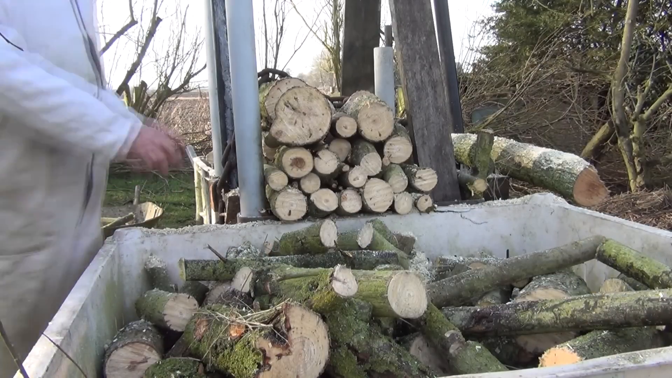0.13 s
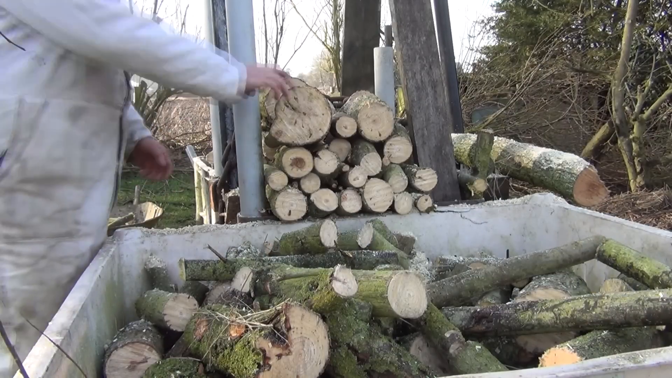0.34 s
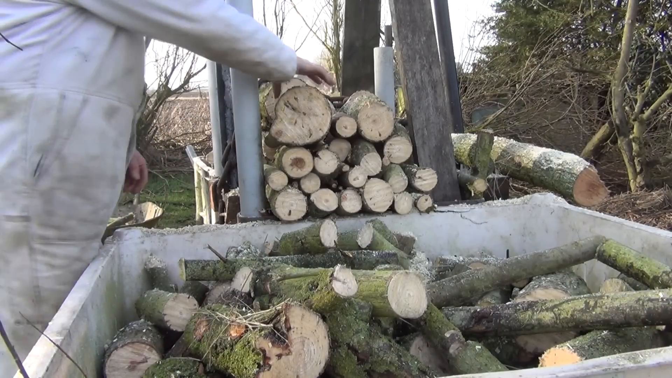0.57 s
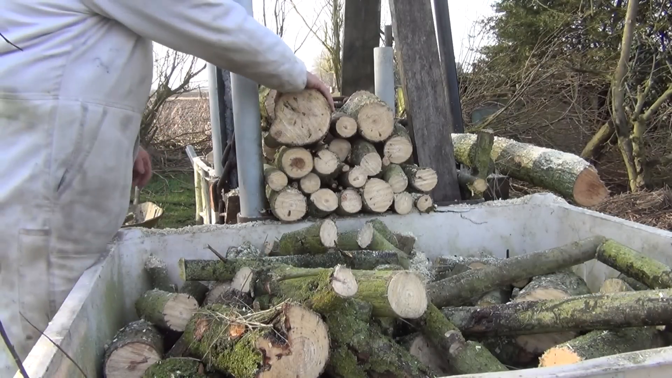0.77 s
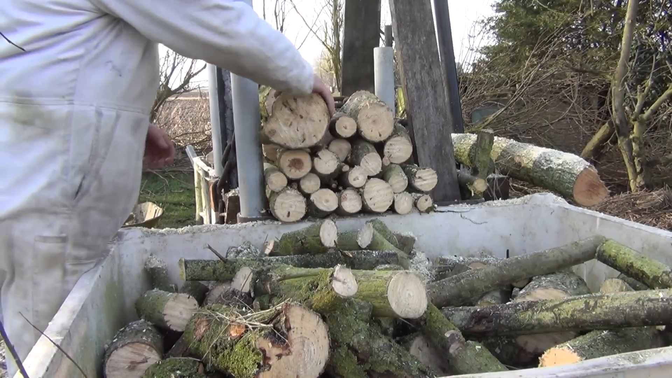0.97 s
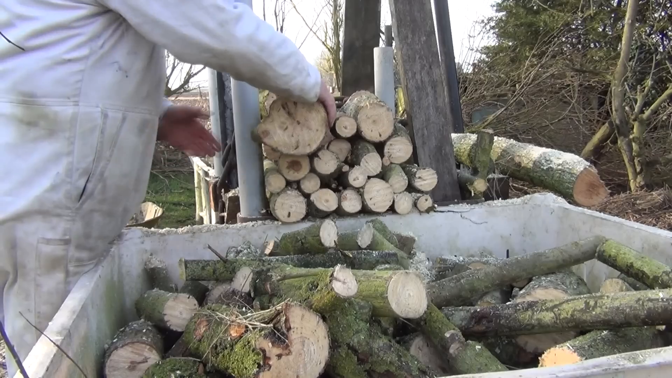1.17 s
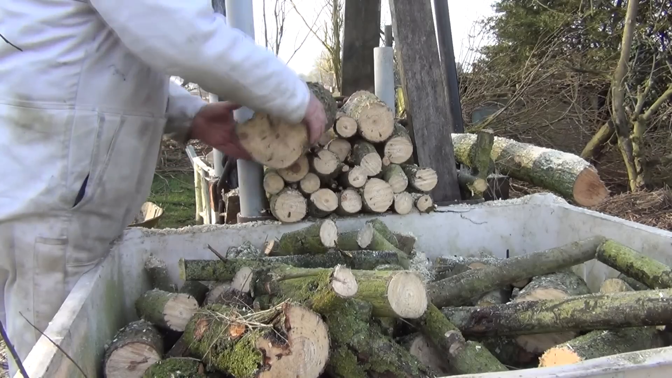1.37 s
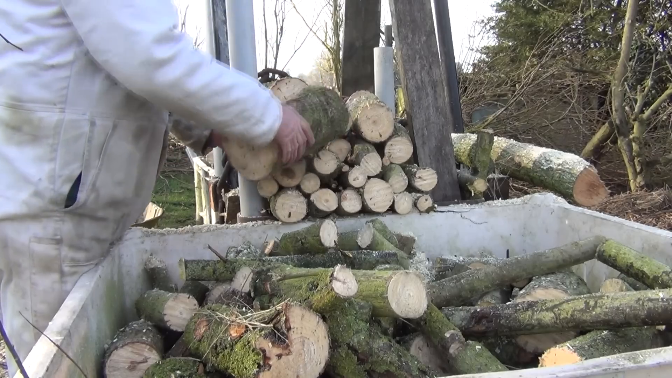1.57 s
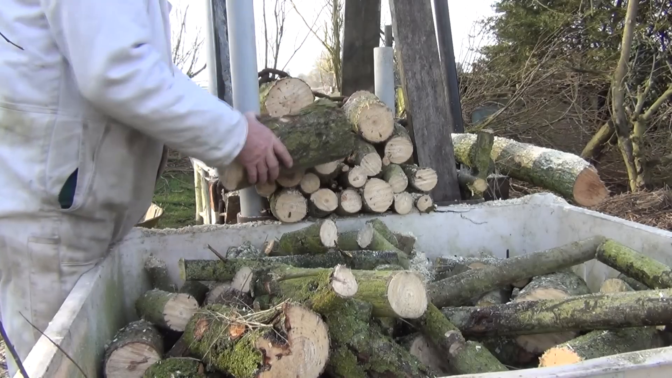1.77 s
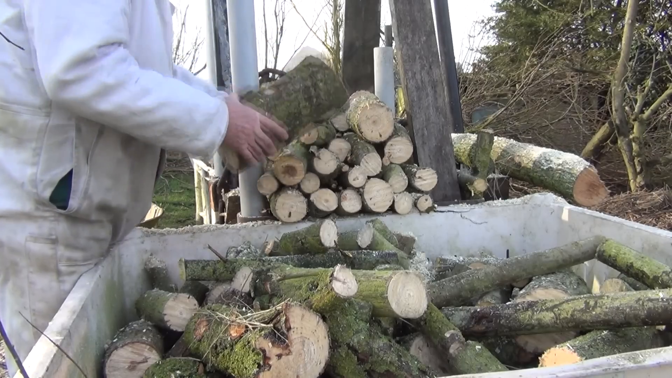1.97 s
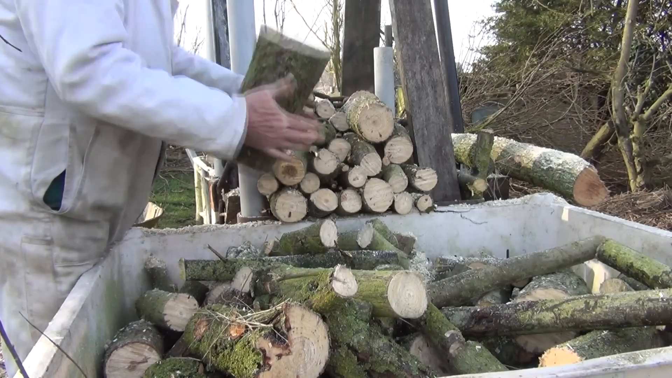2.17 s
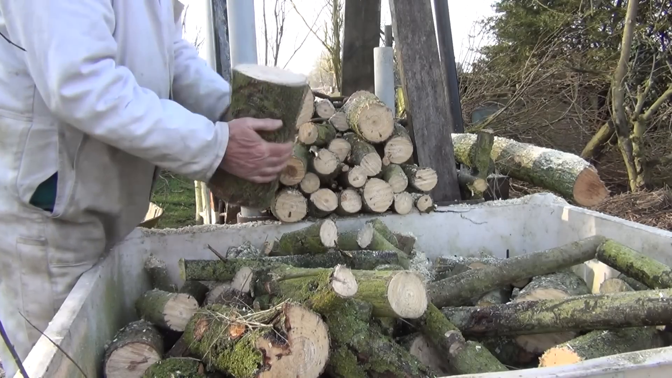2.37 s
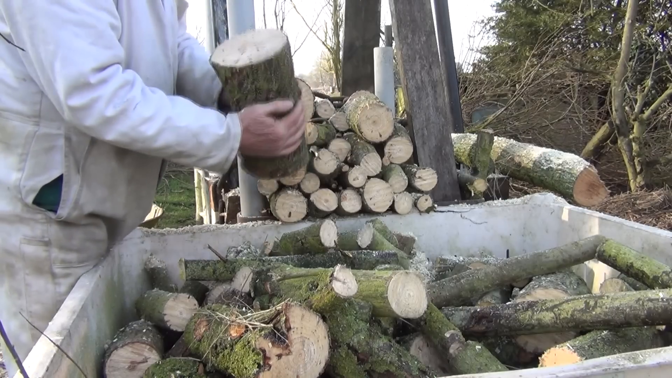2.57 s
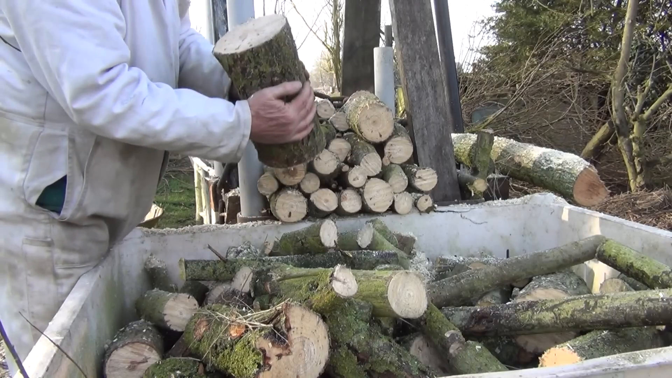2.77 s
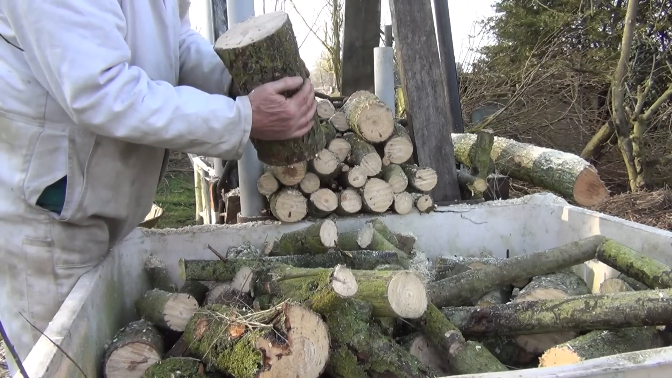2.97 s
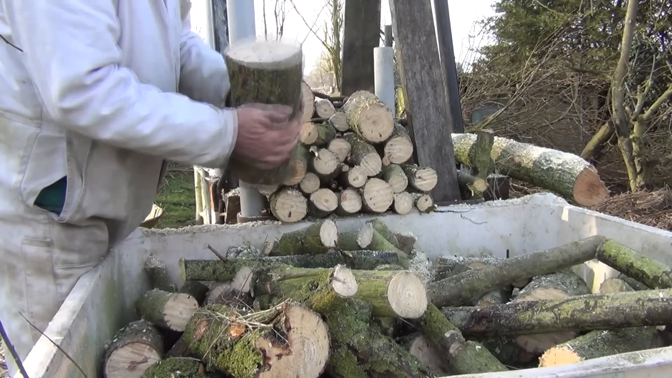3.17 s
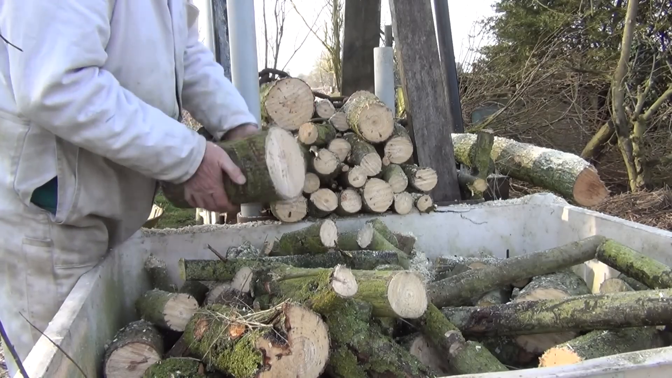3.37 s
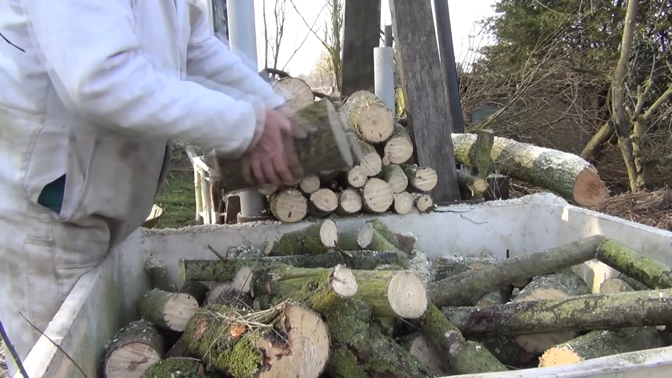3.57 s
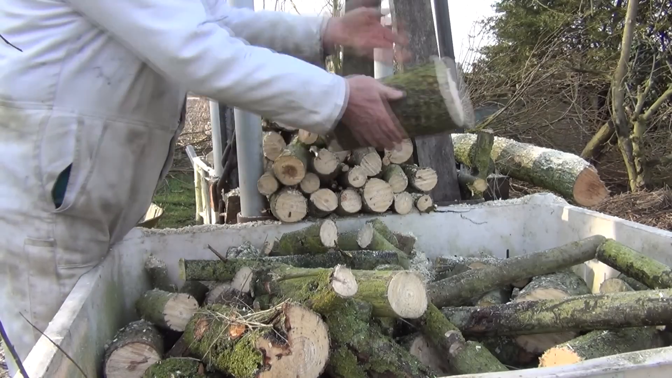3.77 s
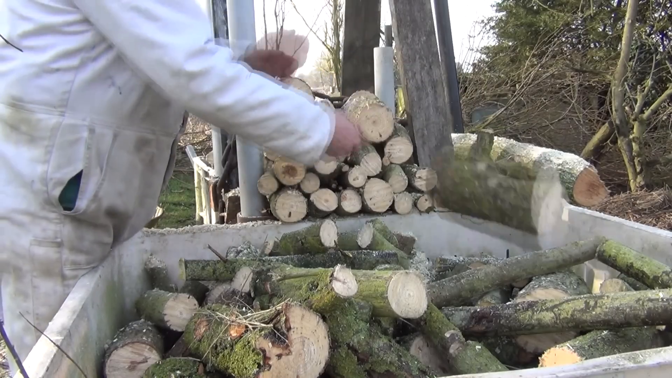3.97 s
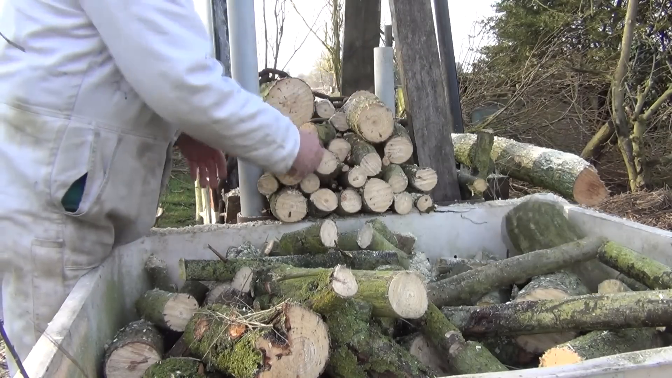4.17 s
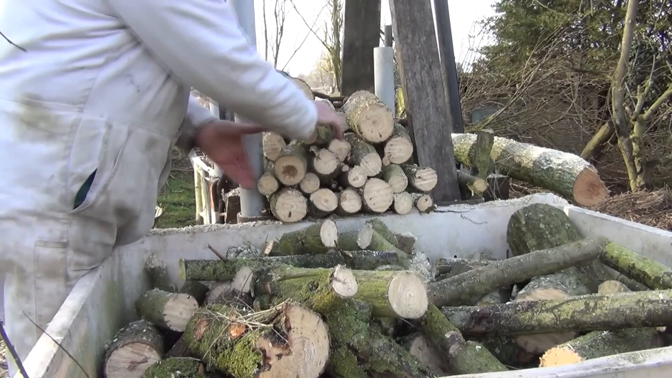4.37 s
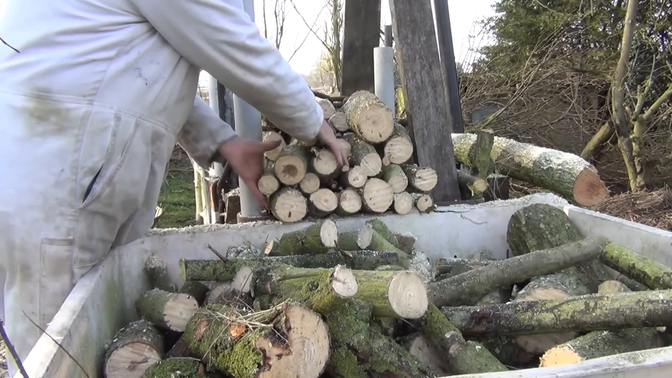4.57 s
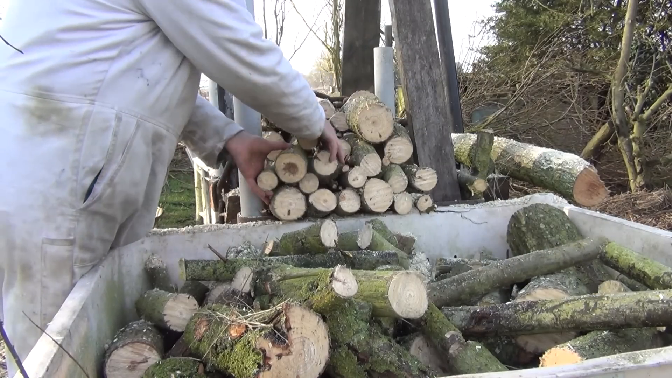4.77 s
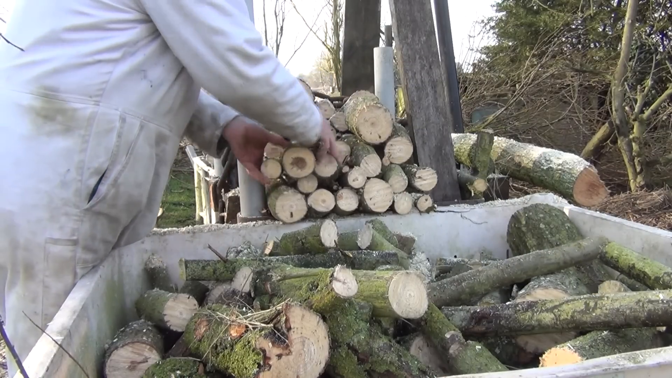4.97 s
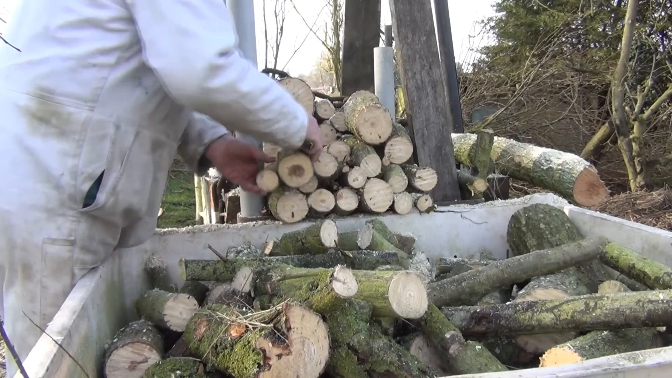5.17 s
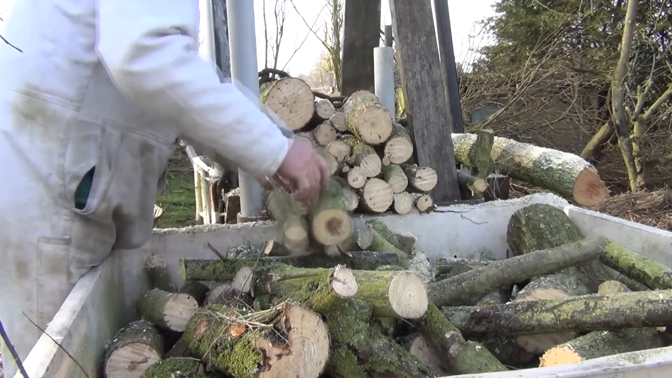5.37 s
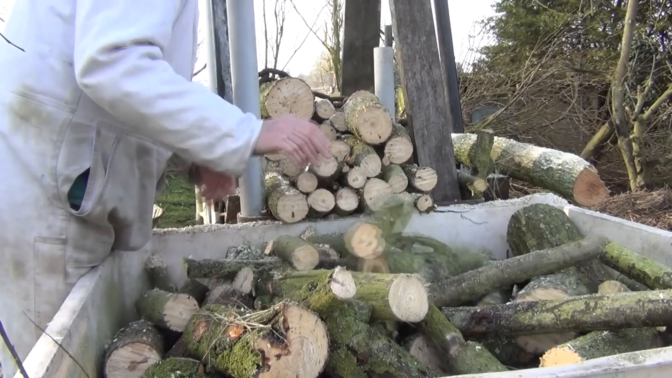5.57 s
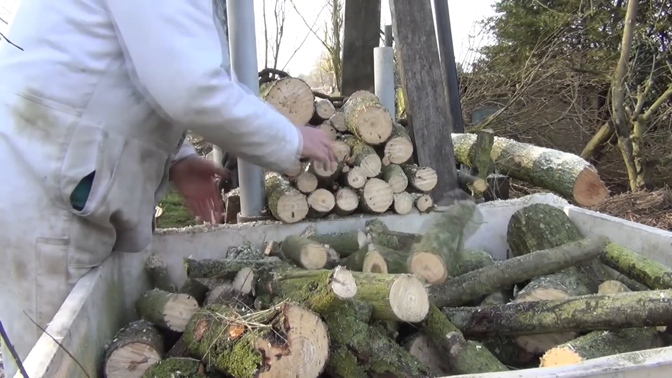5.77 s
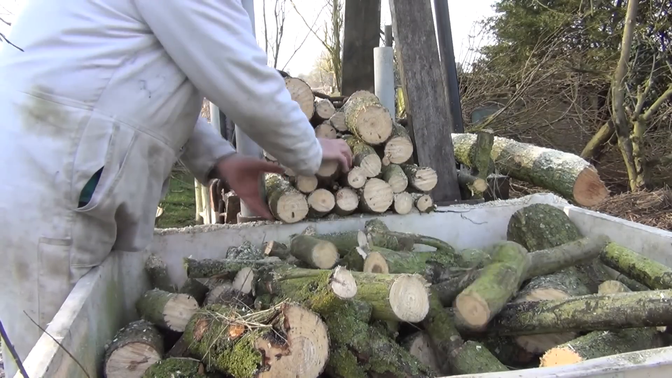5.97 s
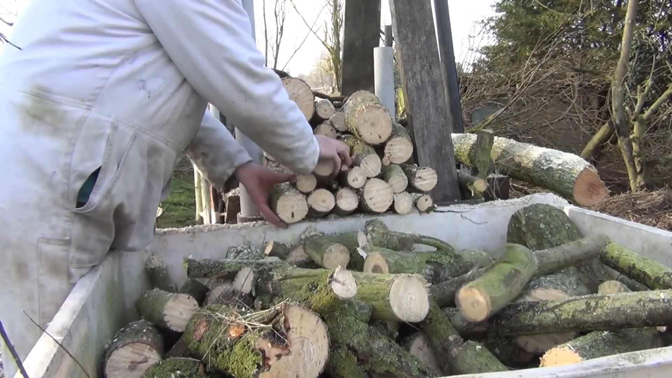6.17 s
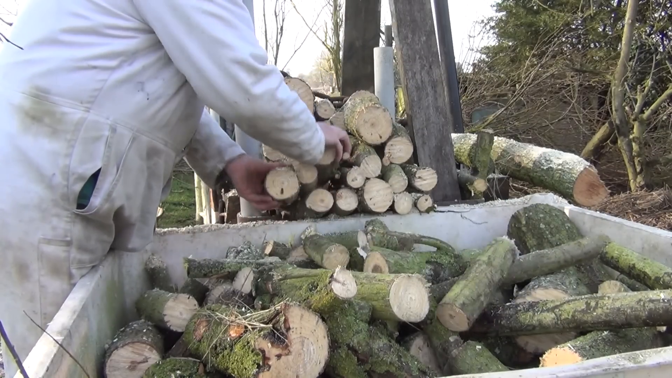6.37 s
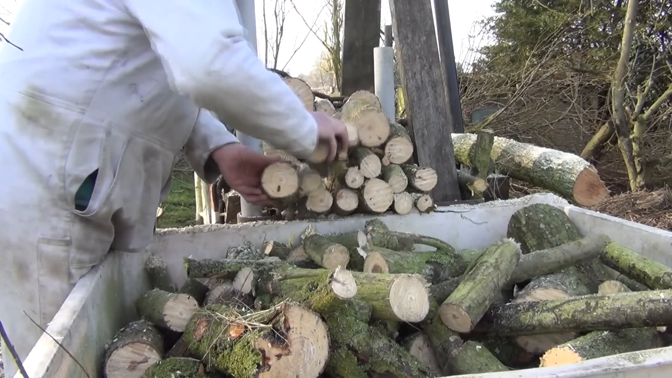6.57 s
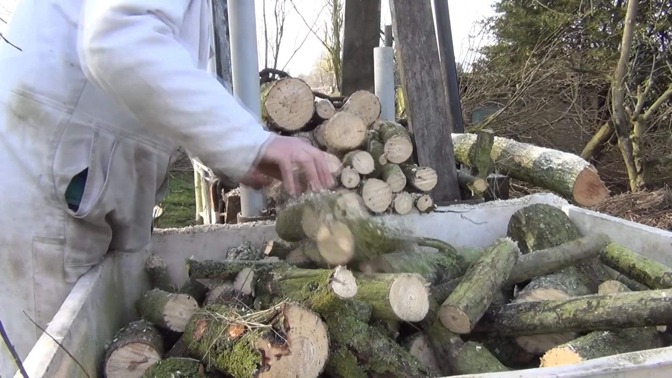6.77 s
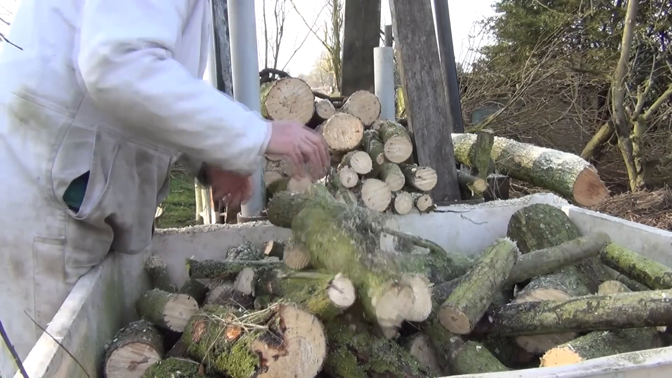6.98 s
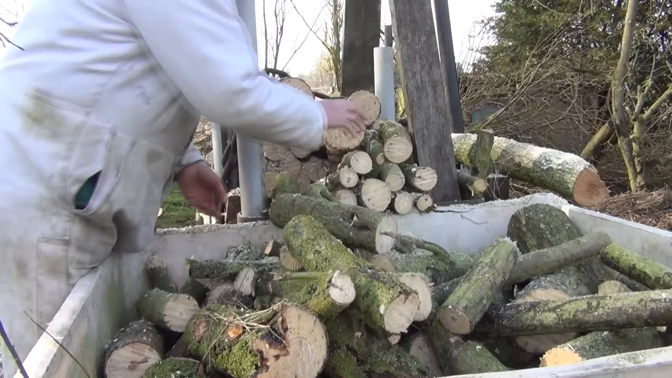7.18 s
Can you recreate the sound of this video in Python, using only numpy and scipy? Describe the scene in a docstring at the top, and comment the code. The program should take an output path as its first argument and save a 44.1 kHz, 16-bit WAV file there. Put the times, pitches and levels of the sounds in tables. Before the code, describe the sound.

Outdoors, a quiet rustle and scrape, then a thrown log lands with a loud tumbling clatter, followed by smaller logs knocking and rolling down.

```python
"""A small bird whistles at once as far traffic and a machine's hum swell up: an open yard, out of doors.
Next a soft, breathy rush swells to the left; then, close to the microphone, short green logs are pulled off
a stack and tossed onto a heap in a steel trailer. Decaying notes and noise bursts make the thuds and knocks;
shaped grit makes rolling, bark scrapes and sleeve rustle; gliding sines whistle; trailer and hedge echo."""
import sys
import numpy as np
from scipy import signal
from scipy.fft import rfft, irfft, next_fast_len
from scipy.io import wavfile
from scipy.ndimage import uniform_filter1d, map_coordinates

SR = 44100
rng = np.random.default_rng(int(sys.argv[2]) if len(sys.argv) > 2 else 0)


def digitize_waveform(pressure):
    """Quantize a signal to 16-bit integers and store it at the path in sys.argv[1].

    Rows of a 2-D input are taken as channels; values are limited to [-1, 1].
    """
    field = np.atleast_2d(pressure).T
    bounded = np.clip(field, -1, 1)
    quanta = np.round(bounded * 32767).astype(np.int16)
    wavfile.write(sys.argv[1], SR, quanta)


N = 318843  # samples

# Far traffic, wind and hiss, spectrum shape: freq_hz, level_db (per Hz)
AIR_SPECTRUM = [(12, -38), (20, -2.5), (131, -1), (195, -8.5), (258, -12), (382, -16), (652, -15),
                (966, -13), (1080, -12.5), (1350, -22.5), (2440, -23.5), (2660, -22.5), (5520, -29.5),
                (15200, -32.5), (16500, -53)]
AIR_DB = -57  # before the swell
# Likeness of left and right in the air: freq_hz, likeness (0-1)
AIR_LIKENESS = [(60, 0.92), (240, 0.87), (950, 0.87), (2000, 0.62), (2700, 1), (4800, 1), (6500, 0.82),
                (10000, 0.99), (15000, 0.99)]
# The background grows at first: time_s, air_gain_db, hum_gain_db
SWELL = [(0, 2, -22), (.5, 5, -3.5), (1.5, 2, 3), (5, 1, 5), (7.23, 3.5, 2)]
# Tones of the far machine, before the swell: freq_hz, level_db
HUM_TONES = [(127.5, -59), (255, -69.5)]
# Noisy bands of the far machine: freq_hz, width_hz, level_db
DRONE_BANDS = [(657, 17, -75), (1095, 49, -67.5), (1830, 360, -68)]
# Bird whistles: start_s, length_s, first_hz, last_hz, level_db (before a 1 dB lift)
WHISTLES = [(0.005, 0.025, 3800, 2800, -54.5), (0.604, .04, 4230, 4370, -63),
            (0.679, 0.11, 3980, 3940, -61), (0.897, 0.072, 3880, 3940, -64),
            (2.272, 0.044, 4600, 4350, -63), (2.31, 0.053, 4430, 4350, -65), (2.43, 0.089, 3170, 3050, -66),
            (2.568, 0.092, 4295, 4230, -55.5), (2.71, .04, 3050, 2950, -64),
            (2.752, 0.024, 3580, 3180, -62.5), (2.768, 0.049, 3250, 3030, -59.5),
            (2.905, 0.088, 4190, 4184, -50), (3.058, 0.024, 3450, 2900, -68),
            (3.098, 0.055, 3200, 3090, -61), (3.154, 0.023, 3700, 3000, -57),
            (3.222, 0.033, 4020, 4120, -65), (3.246, 0.11, 4150, 4140, -55.5),
            (3.935, 0.068, 4190, 4180, -53.5), (4.02, 0.053, 4170, 4190, -60),
            (4.325, 0.04, 4150, 4170, -57), (5.704, 0.062, 3870, 3950, -58)]
# Soft, breathy rush: time_s, level_db
RUSH_LEVEL = [(.17, -71), (.21, -57.5), (.45, -58), (.62, -53.5), (.72, -60), (.85, -73)]
# Its bands: freq_hz, width_hz, relative_db
RUSH_BANDS = [(875, 120, -3.5), (1220, 35, 2), (1430, 100, 1.5), (1850, 220, -2.5), (2550, 310, -11.5)]

# Handling: time_s, rolling_db, scrape_db, rustle_db (sleeves and moss)
HANDLING = [(0.7, -99, -81, -87), (0.96, -58, -59.5, -67), (1.16, -54, -58.5, -58.5),
            (1.4, -56.5, -59.5, -65), (1.68, -66.5, -67, -63.5), (2.44, -60, -66, -67.5),
            (3.335, -87, -103, -91), (3.355, -67, -70, -56.5), (3.42, -71, -61, -43.5),
            (3.544, -53, -57, -41.5), (3.6, -54.5, -61, -48), (3.9, -62.5, -67, -54.5),
            (4.07, -61.5, -59, -74), (4.158, -30, -57, -61), (4.33, -43, -44.5, -78),
            (4.408, -38.5, -44.5, -75), (4.62, -56, -66, -60), (4.9, -60, -62.5, -62.5),
            (5.02, -52, -58, -55), (5.26, -49, -53, -51.5), (5.55, -43, -50.5, -56.5),
            (5.63, -52, -58, -75), (5.7, -26, -39, -55), (5.735, -56, -61, -63), (5.8, -49, -64, -65),
            (5.93, -52, -56, -60.5), (6.3, -57, -57, -61.5), (6.37, -45, -50, -59),
            (6.46, -36, -41.5, -49.5), (6.51, -44, -55.5, -56), (6.6, -43, -51.5, -46.5),
            (6.766, -39.5, -53, -49), (6.916, -28, -43, -49), (6.99, -41.5, -47, -60),
            (7.05, -31, -50, -50), (7.14, -38.5, -51, -58.5), (7.23, -40.5, -61, -62)]
# The big log slides out of the hands as it is swung: time_s, scrape_db, shrill_share (0-1)
SLIDE = [(3.335, -65, 0.2), (3.37, -50, 0.3), (3.45, -49.5, 0.25), (3.544, -43.5, 0.53), (3.565, -43, 0.7),
         (3.585, -39.5, 0.69), (3.68, -33.5, 0.74), (3.74, -40.5, 0.9), (3.785, -46.5, 0.51),
         (3.82, -48.5, 0.2), (3.92, -99, 0.3)]
# Spectrum shape of rolling logs: freq_hz, level_db (per Hz)
ROLL_SPECTRUM = [(40, -4.5), (100, 10.5), (250, 11), (500, 0.5), (1000, -17), (2000, -34)]
# Scraped logs: freq_hz, width_hz, relative_db
BARK_BANDS = [(700, 470, 6.5), (1514, 126, 7.5), (1670, 130, 3), (1860, 160, 7), (2660, 660, -3.5)]
# Bark sliding fast over cloth: freq_hz, width_hz, relative_db
SHRILL_BANDS = [(3450, 930, 10), (4660, 2300, 2.5)]
# Spectrum shape of the rustle: freq_hz, level_db (per Hz)
RUSTLE_SPECTRUM = [(1180, -32), (2000, -9.5), (5570, -9), (6030, -8.5), (7720, -7.5), (9540, -5.5),
                   (15400, -16.5), (16100, -30), (16500, -45)]
# Brushes of sleeve and moss: start_s, peak_db
BRUSHES = [(0.71, -55), (1.792, -71), (2.077, -58), (2.528, -62), (3.516, -46), (3.805, -56), (3.911, -52),
           (4.567, -66), (4.642, -68), (4.78, -55), (4.962, -55), (6.098, -69), (6.615, -61), (7.097, -55)]
BRUSH_S = 0.052
SHRILL_RUB_DB = -17.5  # rubbing hands add a shrill scrape, this far under the rustle
SCRAPE_JERK_DB, SLIDE_JERK_DB, RUSTLE_JERK_DB = 2.4, 0.9, 1.1  # level change per unit of jerk
SCRAPE_PATCH_DB, RUSTLE_PATCH_DB = 1.8, 2.6  # rms unevenness over time and frequency

# Dry ticks of twigs and bark flakes: start_s, level_db (before the band filter), centre_hz
TICKS = [(1.1043, -28, 4970), (1.175, -37, 3600), (2.2936, -8, 3250), (3.587, -30, 3600),
         (3.663, -19, 3600), (3.682, -22, 3600), (4.2574, -6.5, 2320), (4.7601, -38.5, 3280),
         (4.881, -46, 3280), (5.0663, -43, 3300), (5.1327, -41, 3300), (5.299, -39, 3300),
         (6.2467, -41, 3300)]
# Bark grinds while a log skids on the heap: start_s, length_s, level_db (before colouring)
GRINDS = [(4.109, .024, -30), (4.132, 0.02, -33.5), (4.195, 0.017, -40.5), (4.219, 0.019, -40),
          (4.27, 0.013, -39), (4.383, 0.047, -52.5), (5.442, 0.068, -40.5), (5.552, 0.014, -44),
          (5.641, 0.069, -42.5), (6.863, .06, -45.5), (6.947, 0.041, -46.5), (7.009, 0.0454, -44)]
GRIND_EDGE_S = 0.0054
# The wood sounding through the grinding: freq_hz, width_hz, gain_db
GRIND_WOOD = [(1300, 1450, 5.5)]
# Hard contacts, log on log: start_s, level_db, pitch_hz, t60_s, crack_db (bark); levels before shaping
KNOCKS = [(0.735, -41.5, 920, 0.033, -52), (0.9243, -35, 1785, 0.049, -20), (0.932, -40, 1860, .05, -31.5),
          (1.103, -45, 1070, 0.044, -28), (1.173, -40.5, 1850, 0.07, -33),
          (1.3037, -41, 1850, 0.068, -30.5), (1.314, -42, 1820, .05, -29), (1.644, -41, 1930, 0.031, -34),
          (2.111, -62, 1050, .05, -35), (2.2919, -7.5, 1830, 0.013, -10.5), (2.2928, -12, 2530, 0.022, -40),
          (2.3165, -35, 1970, 0.035, -28), (3.5456, -36, 3760, 0.036, -20), (3.5885, -29, 3280, 0.042, -43),
          (4.114, -13.5, 1553, 0.066, -24.5), (4.136, -7, 966, 0.057, -21), (4.137, -8, 1830, 0.032, -38),
          (4.1991, -26, 700, 0.22, -36), (4.22, -15.5, 845, 0.12, -25), (4.235, -8, 956, 0.048, -42),
          (4.2547, -8.5, 824, 0.14, -16.5), (4.2719, 2, 1057, 0.025, -35), (4.287, -2, 1144, 0.019, -42.5),
          (4.367, -42, 1670, .05, -30), (4.405, -38, 3590, 0.069, -35), (4.607, -48, 1140, 0.045, -37.5),
          (4.803, -41.5, 1620, 0.053, -36), (4.958, -49, 2390, 0.044, -32.5),
          (5.2604, -42, 1830, 0.21, -35), (5.35, -37, 1420, 0.08, -51), (5.4007, -22, 2030, 0.013, -31.5),
          (5.411, -28, 3500, 0.019, -32), (5.442, -37, 2900, 0.058, -21.5), (5.465, -34, 1300, 0.077, -24),
          (5.471, -33, 2200, 0.053, -30), (5.4818, -35.5, 1880, 0.11, -18),
          (5.5203, -28.5, 1860, 0.072, -22), (5.538, -40, 2280, 0.038, -48), (5.56, -20, 1300, 0.052, -29),
          (5.5689, -17, 2005, 0.052, -10), (5.571, -19, 2700, 0.023, -33), (5.61, -19, 2244, 0.042, -13),
          (5.64, -37, 1030, 0.045, -46), (5.661, -32, 1985, 0.1, -27), (5.681, -26, 1850, 0.048, -24),
          (5.71, -26, 1870, 0.025, -32.5), (5.795, -33.5, 1390, 0.023, -49),
          (5.893, -47, 3230, .045, -30.5), (5.945, -17.5, 1820, 0.025, -36),
          (5.943, -17, 2535, 0.048, -21.5), (5.9931, -32.5, 2200, 0.039, -27.5),
          (6.036, -40, 1860, 0.089, -28), (6.19, -35, 2960, 0.025, -37), (6.433, -36.5, 1130, 0.078, -32),
          (6.5674, -34.5, 1680, 0.062, -35), (6.6068, -38, 1620, 0.073, -36),
          (6.665, -38.5, 1404, 0.13, -42), (6.714, -36, 1670, 0.037, -26.5),
          (6.7481, -23.5, 1810, 0.038, -20), (6.785, -37, 1730, 0.13, -28), (6.8287, -26, 1730, 0.075, -25),
          (6.858, -2, 1369, 0.052, -25.5), (6.8603, -14.5, 1960, 0.038, -45),
          (6.9126, -29, 1600, 0.068, -26), (6.9512, -24, 910, 0.081, -26.5),
          (6.977, -20, 1850, 0.025, -31.5), (7.0265, -26.5, 877, 0.047, -36),
          (7.0962, -24.5, 1840, 0.043, -25)]
# Spectrum shape of cracking and grinding bark: freq_hz, level_db (per Hz)
CRACK_SPECTRUM = [(880, -69), (1500, -11.5), (2500, -2.5), (4850, -2), (10100, -2), (14100, -9),
                  (16500, -26)]
# Noise body of damp wood, filter used twice: freq_hz, width_hz, gain_db (each time)
CLACK_BODY = [(860, 2500, 6.5), (2200, 3520, 4.5)]
# Heavy contacts felt through the heap: start_s, level_db (before shaping), pitch_hz, t60_s
THUDS = [(0.648, -36, 377, 0.079), (0.926, -43, 121, 0.11), (1.133, -33, 140, 0.23),
         (1.342, -34.5, 133, 0.11), (1.796, -39, 113, 0.061), (1.86, -42, 141, .07),
         (1.955, -42, 135, 0.11), (2.108, -26.5, 94, 0.051), (2.292, -20, 272, 0.037),
         (2.2925, -10.5, 990, 0.022), (2.316, -28, 344, 0.039), (2.929, -40, 141, 0.051),
         (3.535, -29, 470, 0.079), (3.661, -25, 450, 0.02), (3.679, -29.5, 427, 0.039),
         (4.111, -1, 360, 0.044), (4.124, -3.5, 440, 0.046), (4.143, -1, 271, 0.04),
         (4.168, -12.5, 154, 0.076), (4.2, -14.5, 162, 0.16), (4.223, 3, 208, 0.024),
         (4.235, 1.5, 557, 0.035), (4.24, -9.5, 76.6, 0.092), (4.248, -1, 479, 0.065),
         (4.267, -3, 337, 0.13), (4.284, 2, 333, 0.059), (4.295, -0.5, 248, 0.056),
         (4.258, -10.5, 146, 0.13), (4.28, -16.5, 632, 0.2), (4.311, 1, 367, 0.066),
         (4.329, -9, 360, 0.059), (4.407, -31.5, 423, 0.084), (4.458, -27.5, 223, 0.11),
         (4.974, -45, 164, 0.22), (5.077, -27.5, 152, 0.074), (5.247, -35.5, 142, 0.22),
         (5.468, -20.5, 146, 0.031), (5.484, -20, 325, 0.043), (5.52, -21.5, 356, 0.037),
         (5.559, -11.5, 510.3, 0.17), (5.658, -29, 130, 0.081), (5.684, -19, 353, 0.14),
         (5.698, -9, 170, 0.039), (5.707, -10, 298, 0.031), (5.82, -34, 150, 0.082),
         (5.942, -12, 668, 0.079), (5.99, -18, 594, 0.066), (6.36, -33, 576, 0.089),
         (6.385, -29, 470, 0.051), (6.405, -30.5, 573, 0.31), (6.437, -21, 534, 0.074),
         (6.46, -23.5, 408, 0.088), (6.751, 1, 220, 0.048), (6.7597, -6, 233, 0.04), (6.768, 3, 248, 0.016),
         (6.857, -14, 259, 0.093), (6.883, -14, 278, .07), (6.896, -9.5, 320, 0.04),
         (6.903, -17, 628, 0.061), (6.911, -6.5, 145, 0.026), (6.956, -18.5, 144, 0.088),
         (7.005, -19.5, 263, 0.15), (7.029, -9.5, 320, 0.062), (7.038, -12.5, 395, 0.055),
         (7.051, -15.5, 334, 0.04), (7.172, -24, 322, 0.089), (7.198, -21, 144, 0.1)]
# Noise body of heap and trailer bed, filter used twice: freq_hz, width_hz, gain_db (each time)
JOLT_BODY = [(86.4, 79, -1.5), (333, 370, 1)]
# Toneless part of a 300 Hz blow (0-1), and its growth per octave of pitch
JOLT_SHARE, JOLT_GROWS = 0.24, 0.05
CLACK_SHARE, CLACK_GROWS = 0.46, -0.07
TWIN_APART, TWIN_DB = 0.099, -13  # widest spacing as a fraction of pitch; level against the main note
SHAKE_S = 0.14  # longest t60 of the noise in a blow

# Where the work is heard: time_s, left_minus_right_db
SIDE_DB = [(0.7, 1.5), (2.1, -0.5), (2.3, 1.5), (3.3, 1.5), (4.1, -1.5), (4.4, -2), (5.6, 0.8),
           (7.23, 0.15)]
# Echoes of trailer and hedge: freq_hz, t60_s
YARD_DECAY = [(150, 0.21), (1000, 0.14), (8000, 0.035)]
TOP_HZ = 16500  # band limit of the recorder


def amp(db):
    """Gain of a level in dB."""
    return 10 ** (np.asarray(db) / 20)


def unit(x):
    """x at rms 1."""
    return x / np.sqrt(np.mean(x ** 2) + 1e-20)


def along(points, hz):
    """(Hz, value) points read on a log frequency axis."""
    f, v = np.transpose(points)
    return np.interp(np.log(hz + 1), np.log(f + 1), v)


def curves(rows):
    """One value per sample for each column after the time; -120 dB outside the table."""
    s, *columns = np.transpose(rows)
    t = np.arange(N) / SR
    return [np.interp(t, s, c, left=-120, right=-120) for c in columns]


def wobble(rate):
    """A smooth random curve, rate knots a second."""
    knots = rng.standard_normal(int(N * rate / SR) + 4)
    return map_coordinates(knots, [np.arange(N) * rate / SR])


def filtered(x, response):
    """x shaped by a real or complex response of frequency."""
    m = next_fast_len(N + SR // 2)
    return irfft(rfft(x, m) * response(np.fft.rfftfreq(m, 1 / SR)), m)[..., :N]


def resonances(modes):
    """Response of (Hz, width, dB) resonances, summed with alternating sign."""
    def response(f):
        total = 0
        for k, (centre, width, db) in enumerate(modes):
            band = 1j * f * width / (centre ** 2 - f ** 2 + 1j * f * width)
            total = total + (-1) ** k * amp(db) * band
        return total
    return response


def grit(rate, spread_db, smooth):
    """Tiny catches, rate a second with a few much larger, over smooth friction noise."""
    size = amp(spread_db * np.minimum(rng.exponential(size=N), 3.5))
    catches = (rng.random(N) < rate / SR) * size * rng.standard_normal(N)
    return unit(catches) + smooth * rng.standard_normal(N)


def patchy(x, depth_db):
    """x with random gains over patches of frequency and time."""
    z = signal.stft(x, nperseg=512)[2]
    field = uniform_filter1d(rng.standard_normal(z.shape[-2:]), size=16, axis=0)
    field = uniform_filter1d(field, size=6, axis=1)
    return signal.istft(z * amp(depth_db * unit(field)), nperseg=512)[1][..., :N]


def add(track, s, sound):
    """Mixes a sound in at time s."""
    part = track[round(s * SR):][:len(sound)]
    part += sound[:len(part)]


def surroundings():
    """Far traffic and air as patchy shaped noise, with a machine's wavering tones and noisy bands."""
    t = np.arange(N) / SR
    s, air_gain_db, hum_gain_db = np.transpose(SWELL)
    pair = patchy(rng.standard_normal((2, N)), depth_db=0.5)

    def mid_side(hz):
        angle = np.arccos(np.clip(along(AIR_LIKENESS, hz), -1, 1)) / 2
        return amp(along(AIR_SPECTRUM, hz)) * [np.cos(angle), np.sin(angle)]

    mid, side = filtered(pair, mid_side)
    air = amp(AIR_DB + np.interp(t, s, air_gain_db)) * unit(np.array([mid + side, mid - side]))
    hum, drone = np.zeros(N), np.zeros(N)
    for hz, db in HUM_TONES:
        hum += amp(db + 1.5 * wobble(4)) * np.sin(2 * np.pi * hz * t + 0.6 * wobble(4))
    hum *= amp(np.interp(t, s, hum_gain_db))
    for hz, width, db in DRONE_BANDS:
        drone += amp(db) * unit(filtered(rng.standard_normal(N), resonances([(hz, width, 0)])))
    return air + hum * amp([[-1.2], [1.2]]) + drone * amp([[1.8], [-1.8]])


def birds():
    """Thin gliding sines; distance leaves a fading, flickering trail behind the steady ones."""
    out, t = np.zeros(N), np.arange(SR // 2) / SR
    for s, length, first_hz, last_hz, db in WHISTLES:
        pitch = np.interp(t, [0, length], [first_hz, last_hz])
        drift = np.cumsum(rng.normal(0, 0.04, len(t)))
        drift *= np.where(t > length, 1, 0.4 if db > -57 else 1.5)  # faint notes are less pure
        phase = 2 * np.pi * np.cumsum(pitch) / SR + drift
        flicker = np.interp(t, np.linspace(0, t[-1], num=40), rng.standard_normal(40))
        edges = np.clip(t / 0.0032, 0, 1) * np.clip((length - t) / 0.0067, 0, 1)
        note = edges * amp(3.4 * flicker)
        steady = abs(last_hz / first_hz - 1) < 0.08
        trail = 0.3 * steady * (t > length) * amp(-60 * (t - length) / 1.1 + 5 * flicker)
        add(out, s, amp(db + 1) * (note + trail) * np.sin(phase))
    return out


def breathy_rush():
    """A soft, breathy rush swells to the left; banded noise."""
    bands = filtered(patchy(rng.standard_normal(N), depth_db=0.5), resonances(RUSH_BANDS))
    return amp(curves(RUSH_LEVEL)[0]) * unit(bands) * amp([[2.5], [-2.5]])


def brushes():
    """Envelope of short strokes that swell and fade."""
    out = np.zeros(N)
    for s, db in BRUSHES:
        add(out, s, amp(db) * np.hanning(round(BRUSH_S * SR)))
    return out


def handling():
    """Logs roll, bark scrapes and slides, sleeves and moss rustle: catches of friction, each coloured."""
    roll_db, scrape_db, rustle_db = curves(HANDLING)
    slide_db, shrill = curves(SLIDE)
    shrill = np.clip(shrill, 0, 1)
    jerks = wobble(45) + 0.29 * wobble(13)  # uneven grip shakes scrape, slide and rustle together

    roll = unit(filtered(grit(600, 2.38, 0.68), lambda hz: amp(along(ROLL_SPECTRUM, hz))))
    roll *= amp(roll_db + 0.86 * wobble(25))

    catches = patchy(grit(2500, 1.8, 1.2), depth_db=SCRAPE_PATCH_DB)
    dull = unit(filtered(catches, resonances(BARK_BANDS)))
    sharp = unit(filtered(catches, resonances(SHRILL_BANDS)))
    scrape = amp(scrape_db) * dull + amp(rustle_db + SHRILL_RUB_DB) * sharp
    scrape *= amp(SCRAPE_JERK_DB * jerks)
    slide = amp(slide_db + SLIDE_JERK_DB * jerks) * ((1 - shrill) * dull + shrill * sharp)

    cloth = patchy(grit(3600, 4.1, 1.2), depth_db=RUSTLE_PATCH_DB)
    rustle = unit(filtered(cloth, lambda hz: amp(along(RUSTLE_SPECTRUM, hz))))
    rustle *= amp(rustle_db + RUSTLE_JERK_DB * jerks) + brushes()
    return roll + scrape + slide + rustle


def ticks():
    """Twigs and bark flakes snap: a click and band-passed noise, dying away within about 15 ms."""
    out, t = np.zeros(N), np.arange(SR // 50) / SR
    for s, db, hz in TICKS:
        snap = amp(db - 60 * t / 0.016) * (rng.standard_normal(len(t)) + 6 * (t == 0))
        band = signal.butter(2, [hz / 1.14, hz * 1.19], "band", fs=SR)
        add(out, s, signal.lfilter(*band, snap))
    return out


def grinding():
    """Envelope of the skids: quick start, even hold, quick stop."""
    out = np.zeros(N)
    for s, length, db in GRINDS:
        t = np.arange(round(length * SR)) / SR
        add(out, s, amp(db) * np.clip(np.minimum(t, length - t) / GRIND_EDGE_S, 0, 1))
    return out


def blows(rows, body, base_share, grows, attack, burst):
    """Each blow rings its log's note and shakes the body with a burst of noise."""
    notes, shakes, t = np.zeros(N), np.zeros(N), np.arange(SR // 4) / SR
    for s, db, hz, t60 in rows:
        share = np.clip(base_share + grows * np.log2(hz / 300), 0, 1)
        rise = amp(db) * (1 - np.exp(-t / attack)) ** 2
        # no log is round: a weaker note lies close to the main one
        twin = hz * (1 + TWIN_APART * rng.uniform(0.49, 1) * rng.choice([-1, 1]))
        note = np.sin(2 * np.pi * hz * t) + amp(TWIN_DB) * np.sin(2 * np.pi * twin * t)
        add(notes, s, (1 - share) * rise * amp(-60 * t / t60) * note)
        decay = amp(-60 * t / min(burst * t60, SHAKE_S))
        add(shakes, s, share * rise * decay * rng.standard_normal(len(t)))

    def twice(f):  # steep skirts
        return resonances(body)(f) ** 2

    body_level = np.std(filtered(rng.standard_normal(N), twice))
    return notes + filtered(shakes, twice) / body_level


def knocks():
    """Hard contacts ring the wood; bark cracks for a few ms, then crumbs fall; skids grind."""
    cracks, t = np.zeros(N), np.arange(SR // 5) / SR
    crumbs = 0.042 * amp(-60 * t / 0.13)
    crumble = (1 - np.exp(-t / 0.0043)) * (amp(-60 * (t / 0.013) ** 2) + crumbs)
    for s, *_, crack_db in KNOCKS:
        add(cracks, s, amp(crack_db) * crumble * rng.standard_normal(len(t)))
    grind = grinding() * unit(grit(3700, 2.5, 0.9))

    def colour(hz):  # 0 dB at 7500 Hz
        return amp(along(CRACK_SPECTRUM, hz) - along(CRACK_SPECTRUM, 7500))

    rings = [row[:-1] for row in KNOCKS]
    wood = blows(rings, CLACK_BODY, CLACK_SHARE, CLACK_GROWS, attack=0.0004, burst=0.96)
    return wood + filtered(cracks + grind, colour) + filtered(grind, resonances(GRIND_WOOD))


def thuds():
    """Soft, heavy contacts: a slower attack and low notes, felt through heap and trailer bed."""
    return blows(THUDS, JOLT_BODY, JOLT_SHARE, JOLT_GROWS, attack=0.0011, burst=1.0)


def yard(x):
    """Echoes as decaying noise; each frequency dies at its own speed."""
    hz, t, z = signal.stft(rng.standard_normal((2, SR // 2)), SR, nperseg=256)
    decay = amp(-60 * t / along(YARD_DECAY, hz)[:, None])
    tail = signal.istft(z * decay, SR, nperseg=256)[1]
    both = tail[0] + 0.11 * tail[1] * np.array([[1], [-1]])  # mostly from the front
    return signal.fftconvolve(x[None], both / np.linalg.norm(tail[0]), axes=1)[:, :N]


def scene():
    """The work moves a little from side to side, close by; thuds lean further right."""
    low, high, handled = thuds(), knocks() + ticks(), handling()
    side_db = np.interp(np.arange(N) / SR, *np.transpose(SIDE_DB))
    lean = amp(side_db * np.array([[0.5], [-0.5]]))
    near = lean * (low * amp([[-0.4], [0.4]]) + high + handled)
    echoes = amp(-15.5) * yard(low + high) + amp(-13.5) * yard(handled)
    far = surroundings() + birds() * amp([[0.8], [-0.8]])
    return far + breathy_rush() + near + echoes


def record(dry):
    """The recorder rounds off the loudest peaks, thins the deepest bass and cuts at its band limit."""
    soft = dry / (1 + np.abs(dry / 0.95) ** 6) ** (1 / 6)
    return filtered(soft, lambda hz: 1j * hz / (45 + 1j * hz) * (hz < TOP_HZ))


dry = scene()
out = record(dry)
digitize_waveform(out)
```